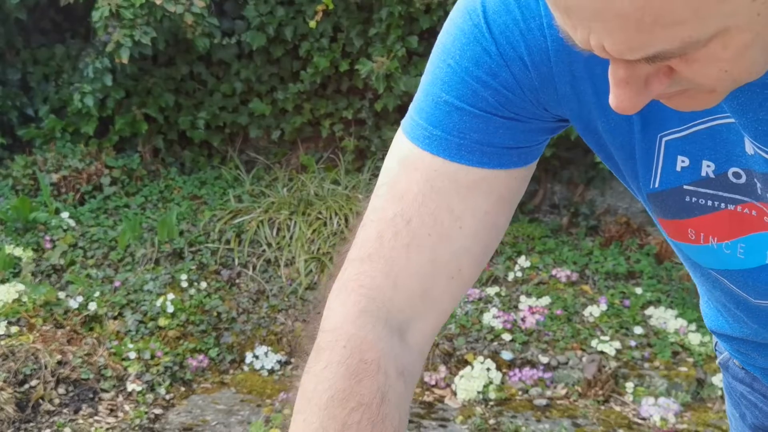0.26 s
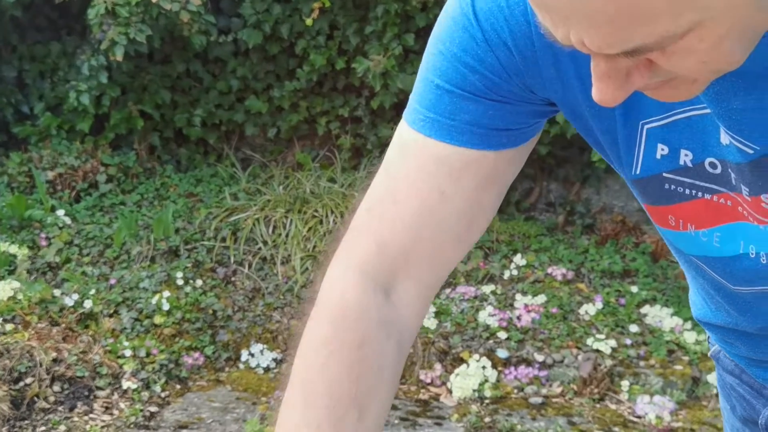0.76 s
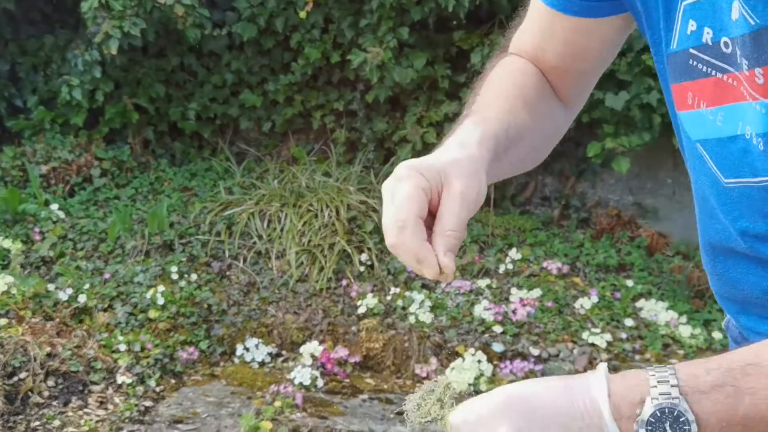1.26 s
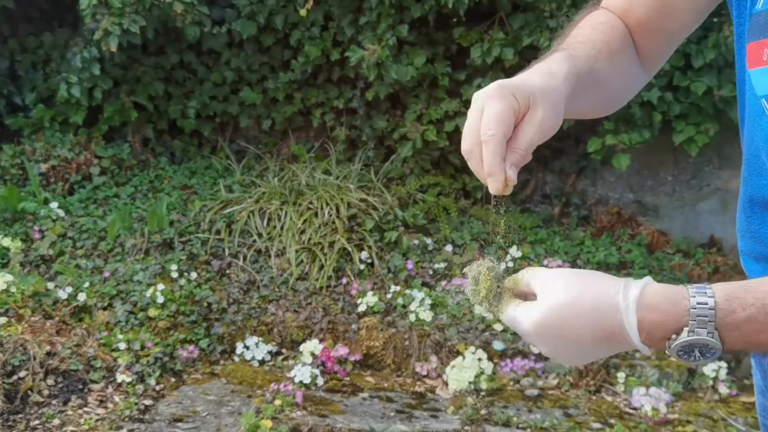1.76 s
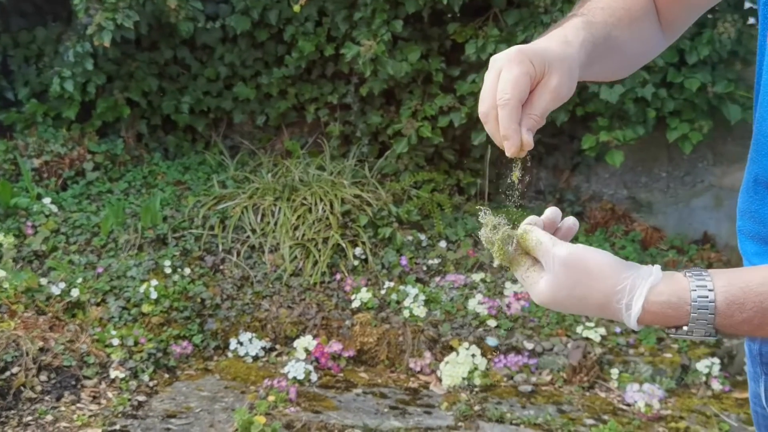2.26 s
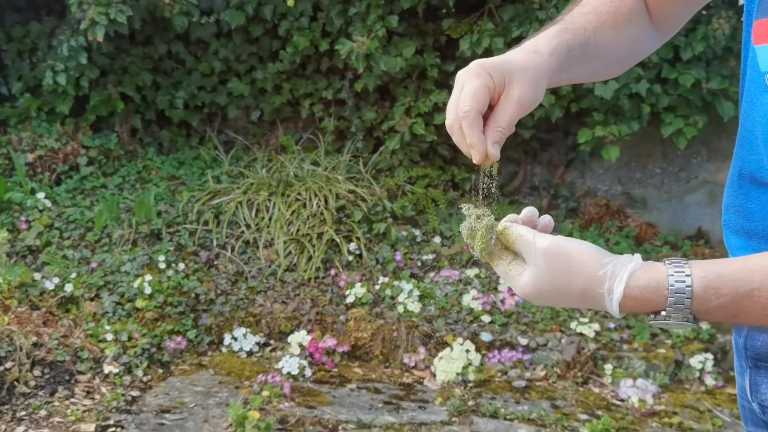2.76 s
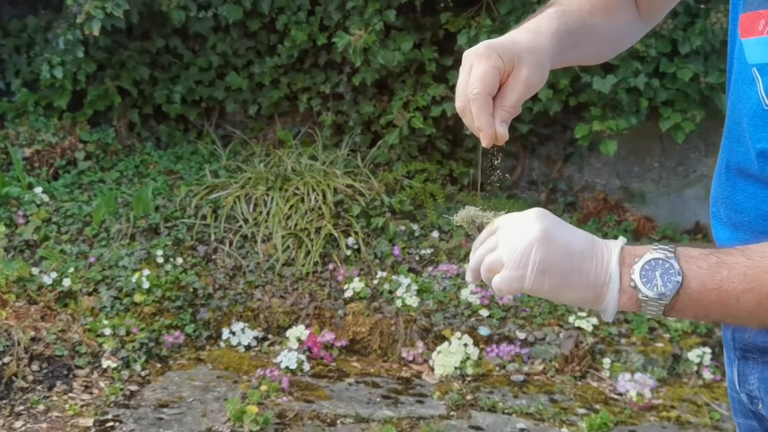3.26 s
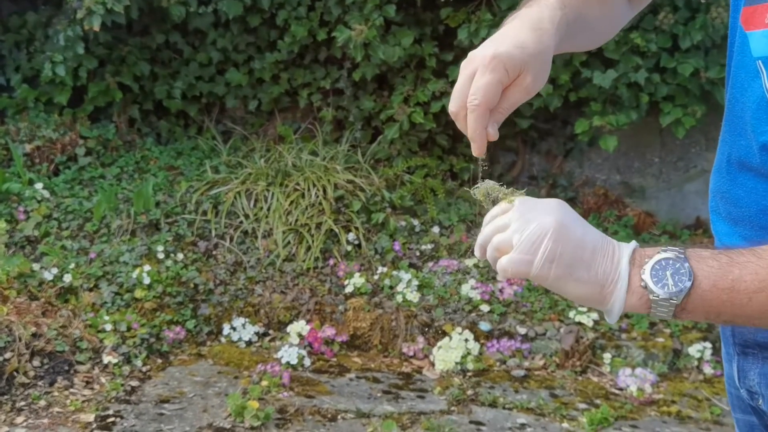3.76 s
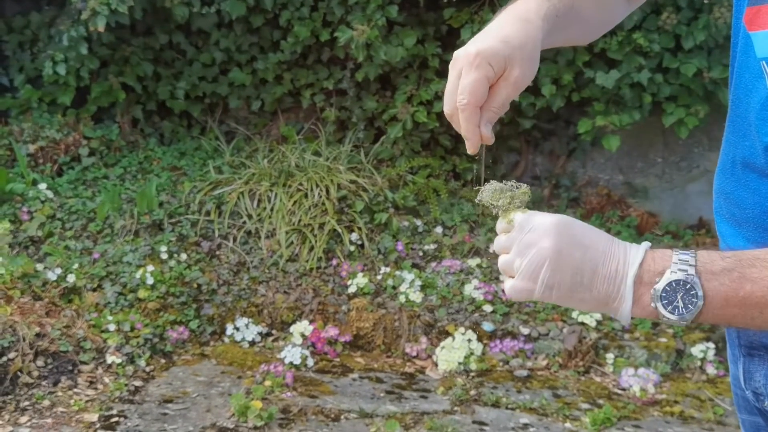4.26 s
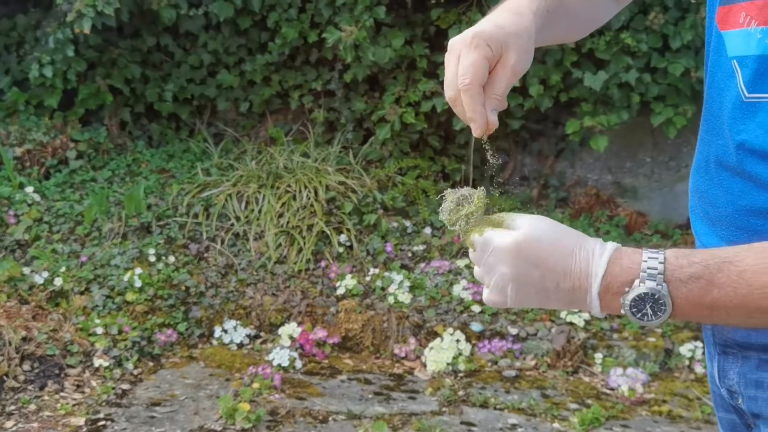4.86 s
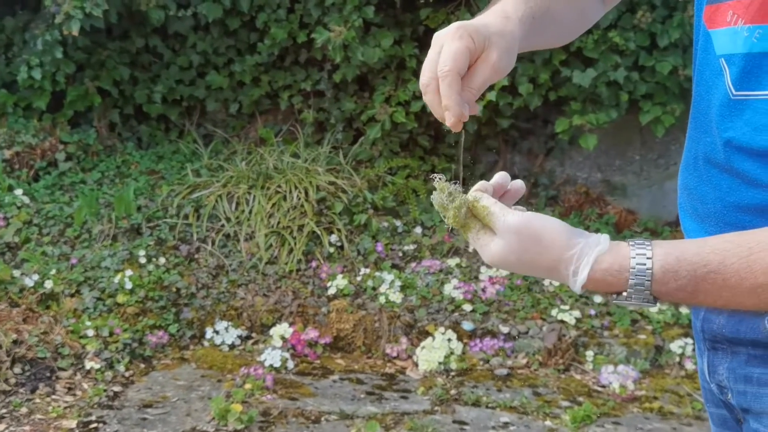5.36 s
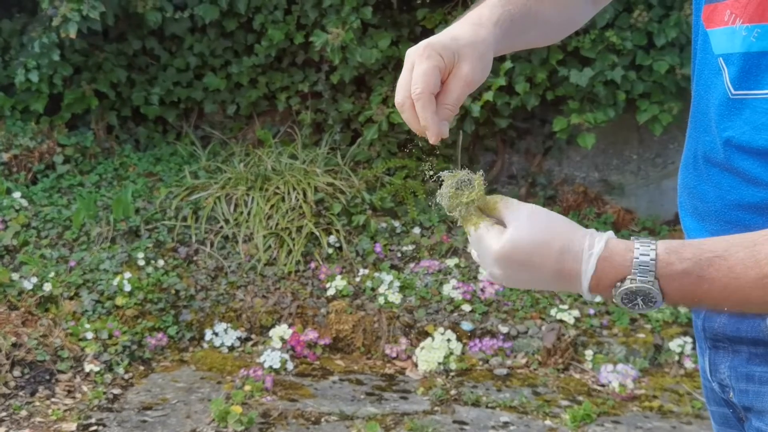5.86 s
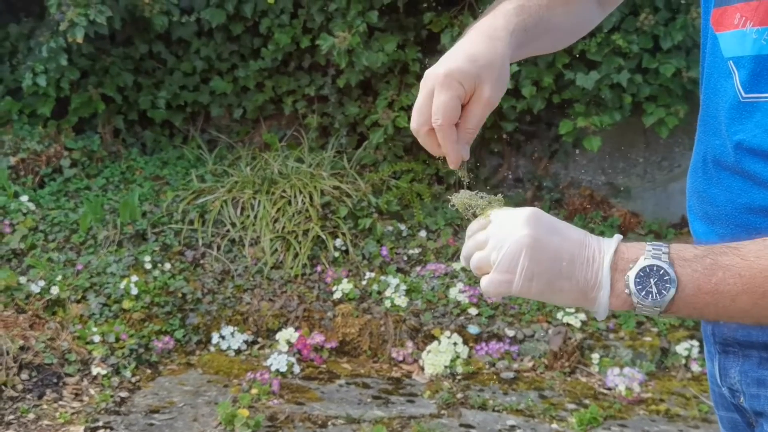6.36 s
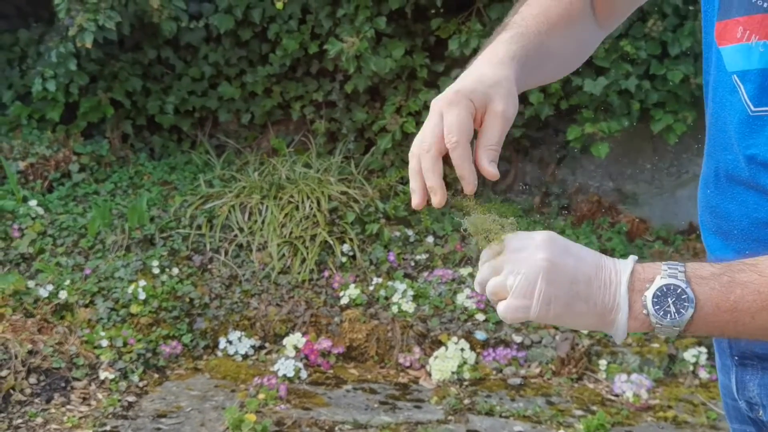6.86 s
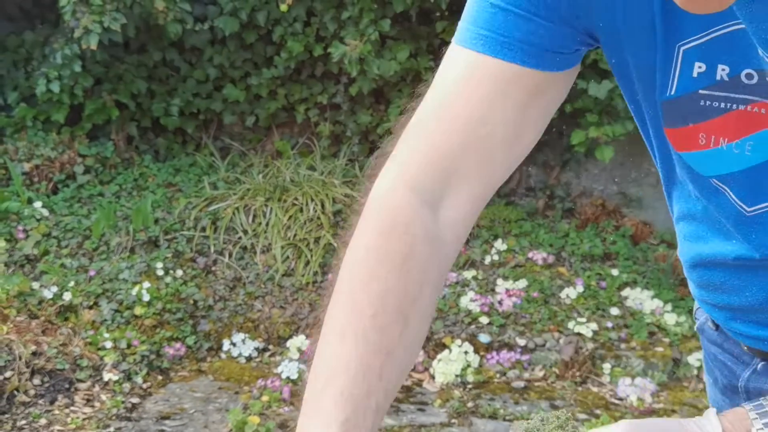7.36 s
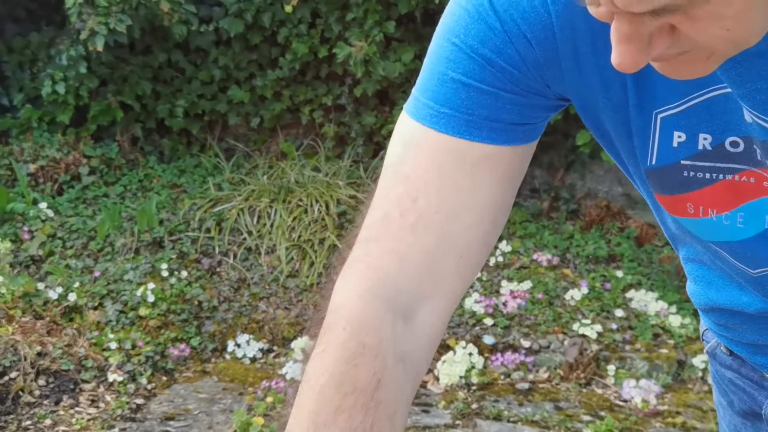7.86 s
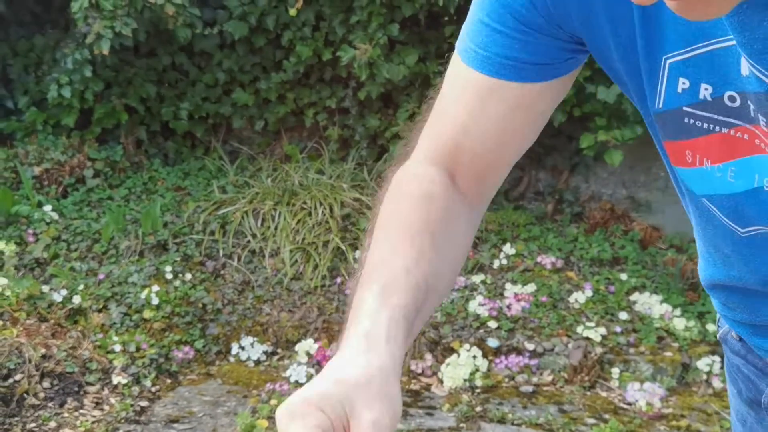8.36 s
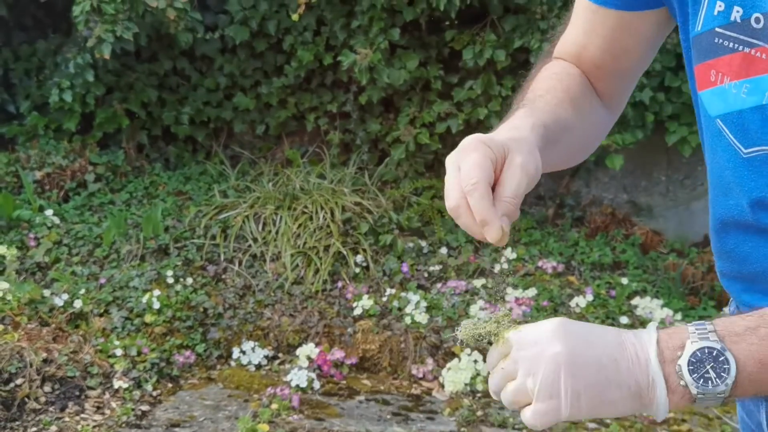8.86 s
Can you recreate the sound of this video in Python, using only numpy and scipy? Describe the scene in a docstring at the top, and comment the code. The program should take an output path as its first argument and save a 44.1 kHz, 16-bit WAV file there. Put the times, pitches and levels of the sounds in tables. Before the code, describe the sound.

In a garden, a hand digs in a packet of dry grains with bright crackles, snaps and a hollow scrape, then stops. A sparrow chirps about once a second, with thin chips, whistles and scolding from the hedges. Only a faint grain patter remains until a second, sharper burst of digging near the end, then a small clink. A far engine hums low throughout. The microphone is close to the packet.

```python
"""A hand digs dry grains out of a packet over a far engine's hum and open air; later it digs again.
Grains: filtered crackle under strokes, with ringing snaps and a thin steady patter; packet: struck modes.
A close sparrow chirps and small birds call and whistle from the hedges: gliding, jittered tones with echoes.
Engine: wandering sine orders over shaped noise; low drones: narrow-band noise; ring and clink: decaying sines."""
import sys
import numpy as np
from scipy import signal
from scipy.fft import rfft, irfft
from scipy.io import wavfile

SR = 44100
rng = np.random.default_rng(int(sys.argv[2]) if len(sys.argv) > 2 else 0)


def transcribe(u):
    """Save the signal u as a 16-bit wav file named by the first command-line argument.

    u: samples, shape (n,) or (channels, n), limited to [-1, 1]; the rate is SR.
    q: integer samples, one column per channel.
    """
    v = np.clip(np.atleast_2d(u).T, -1, 1)
    q = np.round(v * 32767).astype(np.int16)
    wavfile.write(sys.argv[1], SR, q)


N = 402191
TIME = np.arange(N) / SR


def from_db(db):
    """Amplitude factor of a level in dB."""
    return 10 ** (np.asarray(db) / 20)


def rms_one(x):
    """Scales a sound to rms 1."""
    return x / np.sqrt(np.mean(x ** 2) + 1e-20)


def add(track, s, sound):
    """Mixes a sound into a track from time s on."""
    start = max(round(s * SR), 0)
    part = sound[..., :max(N - start, 0)]
    track[..., start:start + part.shape[-1]] += part


def drift(rate_hz, size=N):
    """Random line with a new normal value rate_hz times a second."""
    at = np.arange(size) * rate_hz / SR
    knots = int(at[-1]) + 2
    return np.interp(at, np.arange(knots), rng.standard_normal(knots))


def swells(rows):
    """Power sum of strokes (s, rise s, fall s, dB): 20 dB up in the rise time, 20 dB down in the fall time."""
    power = 0
    for s, rise_s, fall_s, level_db in rows:
        away = np.maximum((s - TIME) / rise_s, (TIME - s) / fall_s).clip(0, 10)
        power = power + from_db(level_db - 20 * away) ** 2
    return np.sqrt(power)


def resonance(x, hz, width_hz):
    """Two-pole resonance, gain 1 on top."""
    r = np.exp(-np.pi * width_hz / SR)
    zeros = np.array([1, 0, -1]) * (1 - r * r) / 2
    poles = [1, -2 * r * np.cos(2 * np.pi * hz / SR), r * r]
    return signal.lfilter(zeros, poles, x)


def per_bin(points):
    """Reads a (Hz, value) table at every frequency of the whole track."""
    hz, value = np.transpose(points)
    return np.interp(np.log(np.fft.rfftfreq(N, 1 / SR) + 1), np.log(hz), value)


def colour(x, spectrum):
    """Gives a sound a spectrum; rms 1."""
    return rms_one(irfft(rfft(x) * from_db(per_bin(spectrum)), N))


def crackle(per_s, spread_db):
    """Random contacts of uneven size and either sign."""
    sizes = from_db(spread_db * np.minimum(rng.exponential(1, N), 4)) * rng.choice([-1, 1], N)
    return sizes * (rng.random(N) < per_s / SR)


def garden(x, lag_ms, near_db, near_t60, tail_db, tail_t60):
    """Direct sound plus early ground and wall echoes and a foliage tail, drawn anew for every sound."""
    t = np.arange(int(tail_t60 * SR)) / SR
    near = from_db(near_db - 60 * t / near_t60) / np.sqrt(near_t60)
    tail = from_db(tail_db - 60 * t / tail_t60) / np.sqrt(tail_t60)
    density = np.hypot(near, tail) * np.sqrt(np.log(1e6) / SR) * (t > .002)
    paths = rng.standard_normal((2, len(t))) * density
    paths[[0, 1], [0, round(lag_ms * SR / 1000)]] = 1    # direct sound
    return signal.fftconvolve(x[None], paths, axes=1)


def note(shape, length_s, base_hz, rough, flutter_db=2.2, trill=0, trill_hz=115, trill_from=0,
         partials=((1, 0),)):
    """Syrinx tone along a shape; the membrane jitters in pitch, flutters in level and may trill part way in."""
    t = np.arange(int(length_s * SR)) / SR
    share, ratio, level_db = np.transpose(shape)
    along = t / length_s
    turns = trill_hz * np.maximum(t - trill_from * length_s, 0)
    jitter = rough * drift(900.5, size=len(t))
    waver = jitter + trill * np.minimum(2 * turns, 1) * np.sin(2 * np.pi * turns)
    hz = base_hz * np.interp(along, share, ratio) * (1 + waver)
    phase = 2 * np.pi * np.cumsum(hz) / SR
    tone = sum(from_db(db) * np.sin(k * phase) for k, db in partials)
    gain = from_db(np.interp(along, share, level_db) + flutter_db * drift(113, size=len(t)))
    return np.sqrt(2) * tone * gain * signal.windows.tukey(len(t), .1)


def calls(rows, shape, place, **voice):
    """Every call (s, length s, base Hz, dB) of one kind, each with its own echoes."""
    out = np.zeros((2, N))
    for s, length_s, base_hz, level_db in rows:
        call = from_db(level_db) * note(shape, length_s, base_hz, **voice)
        add(out, s, garden(call, *place))
    return out


# left-right correlation of diffuse sound: (frequency [Hz], correlation [-1..1])
LIKENESS = [(60, 0.73), (290, 0.84), (640, 0.0061), (1400, -0.43), (3000, 0.2), (12000, 0.013)]


def diffuse(spectrum):
    """Stereo noise from all around, its left-right correlation set per frequency."""
    mid, side = rfft(rng.standard_normal((2, N)))
    alike = np.clip(per_bin(LIKENESS), -1, 1)
    stereo = np.sqrt(1 + alike) * mid + np.sqrt(1 - alike) * side * [[1], [-1]]
    return colour(irfft(stereo, N), spectrum)


# engine hum at twice its rate: (time [s], level before the shared gain [dB])
HUM_LEVEL = [(0.0, -39), (0.28, -42), (1.65, -60.5), (1.7, -47.5), (3.12, -45.5), (3.81, -58.5),
             (3.91, -45.5), (4.32, -70), (5.05, -42.5), (5.13, -61.5), (5.31, -39), (5.41, -49),
             (5.92, -68), (6.07, -42), (6.4, -41.5), (6.45, -64), (6.93, -45), (7.19, -61), (7.34, -47.5),
             (7.8, -46), (7.9, -78), (8.63, -61.5), (9.12, -53)]
# low rumble: (time [s], level before the shared gain [dB])
RUMBLE_LEVEL = [(0.0, -56.5), (1.88, -53.5), (3.45, -59), (5.13, -56.5), (6.37, -51.5), (6.86, -56),
                (8.15, -51), (9.12, -56)]
# engine's weaker orders: (multiple of engine rate [1], starting level against RUMBLE_LEVEL [dB])
ENGINE_ORDERS = [(1, -7.5), (3, -3), (4, -5.5), (5, -8.5)]
# rumble spectrum: (frequency [Hz], density [dB per Hz])
RUMBLE = [(15, -83), (25, -44), (49, -26), (81, -2.5), (108, 1), (177, -9.5), (256, -5), (321, -12),
          (392, -25.5), (600, -39), (780, -72)]
# open-air spectrum: (frequency [Hz], density [dB per Hz])
AIR = [(240, -14), (400, -1.5), (610, -5), (2190, -5), (3790, -17), (5730, -9), (6890, -12.5), (8400, -6.5),
       (10400, -19.5), (11100, -24), (11800, -44), (15500, -34)]
ENGINE_HZ, ENGINE_WANDER_SHARE, ENGINE_RIGHT_LAG_S = 51.9, 0.00806, .0003
HUM_GAIN_DB, HUM_FLICKER_DB = -1, 1.5
ORDER_FADE_DB_PER_S, ORDER_FLICKER_DB = 1.44, 4
RUMBLE_GAIN_DB, AIR_DB, AIR_FLICKER_DB = 3, -60.5, .5


def background():
    """Far engine orders on one wandering rate, the hum swelling on its way through the air, rumble and hiss."""
    hum_db = np.interp(TIME, *np.transpose(HUM_LEVEL))
    rumble_db = np.interp(TIME, *np.transpose(RUMBLE_LEVEL))
    turns = np.cumsum(ENGINE_HZ * (1 + ENGINE_WANDER_SHARE * drift(5))) / SR
    phase = 2 * np.pi * (turns - ENGINE_HZ * np.array([[0], [ENGINE_RIGHT_LAG_S]]))
    orders = [(2, hum_db + HUM_GAIN_DB + HUM_FLICKER_DB * drift(9))]
    for k, db in ENGINE_ORDERS:
        orders.append((k, rumble_db + db - ORDER_FADE_DB_PER_S * TIME + ORDER_FLICKER_DB * drift(6)))
    hum = np.sqrt(2) * sum(from_db(db) * np.sin(k * phase + rng.uniform(0, 2 * np.pi)) for k, db in orders)
    rumble = from_db(rumble_db + RUMBLE_GAIN_DB) * diffuse(RUMBLE)
    air = from_db(AIR_DB + AIR_FLICKER_DB * drift(2.45)) * diffuse(AIR)
    return hum * from_db([[-.9], [.9]]) + rumble + air


# finger strokes in the grains: (time of peak [s], length [s], level [dB])
STIRS = [(.01, 0.21, -32.5), (0.088, 0.14, -39.5), (0.224, .5, -52), (0.304, 0.086, -34.5),
         (0.424, 0.41, -44), (0.508, .09, -46), (0.542, 0.12, -41), (0.579, 0.091, -40), (1.203, 0.36, -58),
         (6.357, 0.18, -55), (6.601, 0.18, -53), (6.928, 0.13, -53.5), (7.626, .05, -52),
         (7.676, 0.12, -38), (7.745, 0.15, -28.5), (7.864, 0.061, -35.5), (7.887, 0.11, -38),
         (7.987, 0.15, -37.5), (8.068, 0.025, -40), (8.759, 0.18, -53)]
# packet snaps: (time [s], direct peak level [dB])
SNAPS = [(0.0217, -10), (.0635, -31), (.083, -32), (0.284, -12.5), (0.293, -16.5), (.309, -19),
         (7.608, -18), (7.63, -18.5), (7.641, -18), (7.657, -16), (7.692, -17), (7.779, -17), (7.868, -20),
         (7.892, -23), (7.959, -26), (7.99, -18), (7.997, -19.5), (8.005, -21), (8.103, -37), (8.162, -33)]
# spectrum of rubbing grains: (frequency [Hz], density [dB per Hz])
GRAINS = [(410, -69.5), (700, -33), (993, -11), (1240, -20.5), (1580, -26.5), (2430, -16.5), (3730, -14.5),
          (6180, -4.5), (7030, -7), (8430, 5.5), (10100, -10.5), (12300, -29), (15500, -28)]
# hand position: (right lag [ms], early echoes [dB], early t60 [s], tail [dB], tail t60 [s])
AT_HAND = (.09, -10, .03, -20, .3)
STIR_RISE_SHARE = .46    # of a stroke's length
SHAKE_DB, SHAKE_RISE_S, SHAKE_FALL_S = -24.5, 0.0027, 0.056    # level against the snap's peak
CREASES_PER_S, CREASE_DB = 130, -5    # level against the stroke
PATTER_PER_S, PATTER_DB = 120, -73
CLUMP_DB, SCATTER_DB = 2.5, 1
SNAP_SPREAD_SHARE, SNAP_T60_S = .025, .012


def grains():
    """Grains slip in clumps, creases give, snaps ring and shake grains loose, a few patter on the leaves."""
    strokes = [(s, STIR_RISE_SHARE * length, (1 - STIR_RISE_SHARE) * length, db) for s, length, db in STIRS]
    shakes = [(s + SHAKE_RISE_S, SHAKE_RISE_S, SHAKE_FALL_S, db + SHAKE_DB) for s, db in SNAPS]
    stir = swells(strokes + shakes) * from_db(CLUMP_DB * drift(220))
    direct = stir * colour(crackle(per_s=4500, spread_db=3.6), GRAINS)
    direct += stir * from_db(CREASE_DB) * colour(crackle(CREASES_PER_S, spread_db=0.5), GRAINS)
    direct += from_db(PATTER_DB) * colour(crackle(PATTER_PER_S, spread_db=7.0), GRAINS)
    t = np.arange(SR // 50) / SR
    for s, peak_db in SNAPS:
        crack = rng.standard_normal(len(t)) * from_db(-60 * t / SNAP_T60_S)
        detune = 1 + SNAP_SPREAD_SHARE * rng.uniform(-1, 1)
        narrow = resonance(crack, hz=8450 * detune, width_hz=410)
        snap = resonance(narrow, hz=7540, width_hz=2900)
        add(direct, s, from_db(peak_db) * snap / np.abs(snap).max())
    # ground and body scatter the rustle, unlike on each side
    scattered = stir * colour(rng.standard_normal((2, N)), GRAINS)
    both = garden(direct, *AT_HAND)[:, :N] + from_db(SCATTER_DB) * scattered
    return both * from_db([[.6], [-.6]])


# packet bumps: (time [s], level [dB], contact softness [s])
BUMPS = [(0.305, -40.5, 0.00023), (7.656, -19, 0.0018), (7.678, -36, 0.00013), (7.698, -40, 0.00025),
         (8.102, -35.5, 0.00013), (8.136, -38, 0.00052)]
# hand scrapes along the packet's wall: (time of peak [s], rise [s], fall [s], level [dB])
SCRAPES = [(.03, 0.08, 0.14, -52.5), (.31, 0.09, 0.16, -52.5), (.57, 0.069, 0.06, -50.5),
           (7.69, 0.048, 0.12, -48.5), (7.77, 0.031, 0.052, -39.5)]
# packet modes: (frequency [Hz], level [dB], t60 [s])
PACKET_MODES = [(182, -10.5, 0.04), (333, -5.5, 0.018), (410, -12, 0.025), (1018, -13, 0.053),
                (1086, 3.5, 0.021), (1210, -22, 0.075), (2153, -7.5, 0.032)]


def packet():
    """Soft bumps stir the low modes, hard ones the hollow ring too; scraping friction keeps the modes going."""
    out = np.zeros(N)
    t = np.arange(SR // 8) / SR
    for s, level_db, soft_s in BUMPS:
        ring = np.zeros(len(t))
        for hz, db, t60 in PACKET_MODES:
            ring += from_db(db + rng.normal(0, 1.5) - 60 * t / t60) * np.cos(2 * np.pi * hz * t)
        push = np.hanning(int(soft_s * SR) + 3)
        add(out, s, from_db(level_db) * np.convolve(ring, push / push.sum()))
    friction = np.diff(crackle(per_s=900, spread_db=3), prepend=0)
    hollow = np.zeros(N)
    for k, (hz, db, t60) in enumerate(PACKET_MODES):
        width_hz = np.log(1000) / (np.pi * t60)
        hollow += (-1) ** k * from_db(db) * resonance(friction, hz, width_hz)
    out += swells(SCRAPES) * rms_one(hollow)
    return garden(out, *AT_HAND)[:, :N]


# piping runs: (start [s], end [s], time of peak [s], pitch at peak [Hz], peak level [dB], fade [dB per s])
PIPING = [(0.018, 1.38, .25, 5130, -57, 14), (3.452, 4.68, 3.75, 5143, -56.5, 13),
          (7.776, 8.97, 7.98, 5210, -52.5, 12)]
# level note: (share of length [0..1], pitch / base pitch [1], level [dB])
LEVEL = [(0, .94, -11), (.12, .99, -2), (.6, 1, 0), (.8, 1, -2), (1, .99, -10)]
# hedge: (right lag [ms], early echoes [dB], early t60 [s], tail [dB], tail t60 [s])
HEDGE = (0, 0.5, 0.33, -17, 0.5)
PIPE_EVERY_S, PIPE_S = .099, .085
PIPE_RISE_DB_PER_S, PIPE_SAG_HZ_PER_S = 23, 44.4


def piping():
    """A far bird's thin note repeats so fast that echoes join it; each run swells, fades and sags in pitch."""
    out = np.zeros((2, N))
    for start, end, peak_s, pitch_hz, level_db, fade_db_per_s in PIPING:
        notes = []
        for s in np.arange(start, end, PIPE_EVERY_S):
            drop_db = max(PIPE_RISE_DB_PER_S * (peak_s - s), fade_db_per_s * (s - peak_s))
            notes.append((s, PIPE_S, pitch_hz - PIPE_SAG_HZ_PER_S * (s - peak_s), level_db - drop_db))
        out += calls(notes, LEVEL, HEDGE, rough=.012, flutter_db=2.5)
    return out


# clink modes: (frequency [Hz], level [dB], t60 [s])
CLINK_MODES = [(1496, -58, 0.63), (2500, -38.5, 0.39), (4750, -42, 0.33), (5800, -46, 0.13),
               (7500, -44, .15)]
CLINK_S = 9.082
RING_S, RING_HZ, RING_DB, RING_T60_S = .066, 2013, -45.5, 0.27


def clink():
    """Small hard things are touched and ring on: one with a single decaying tone, one with several."""
    out = np.zeros(N)
    t = np.arange(SR // 2) / SR
    add(out, RING_S, from_db(RING_DB - 60 * t / RING_T60_S) * np.sin(2 * np.pi * RING_HZ * t))
    modes = sum(from_db(db - 60 * t / t60) * np.sin(2 * np.pi * hz * t) for hz, db, t60 in CLINK_MODES)
    add(out, CLINK_S, modes)
    return garden(out, *AT_HAND)[:, :N]


# level whistles: (time [s], length [s], pitch [Hz], level [dB])
WHISTLES = [(.232, 0.024, 5100, -51), (5.885, 0.16, 4280, -47), (6.143, 0.16, 4200, -48)]
# thin notes that sweep up and hold: (time [s], length [s], base pitch [Hz], level [dB])
UPSWEEPS = [(.448, 0.029, 4340, -45.5), (1.78, 0.09, 6350, -53.5), (5.83, 0.079, 6340, -57.5)]
# very high falling notes: (time [s], base pitch [Hz], level [dB])
SEEPS = [(3.105, 7180, -58), (3.145, 6940, -53), (3.295, 6490, -58.5), (3.39, 6600, -58),
         (5.668, 8250, -39.5), (7.2, 7220, -58.5), (7.41, 7260, -57), (7.465, 6920, -54)]
# high buzz after the loudest falling note: (time [s], length [s], pitch [Hz], level [dB])
BUZZES = [(5.745, 0.087, 8000, -49.5)]
# faint, hoarse far call: (time [s], length [s], base pitch [Hz], level [dB])
FAR_CALLS = [(7.02, 0.145, 1332, -67.5)]
# note shapes: (share of length [0..1], pitch / base pitch [1], level [dB])
SLIDE = [(0, .99, -20), (.3, 1, -9), (.42, .985, 0), (.7, .95, -3), (1, .91, -10)]
RISE = [(0, .65, -9), (.25, .77, -4), (.48, .98, -3), (.65, 1, -1), (.9, .96, 1), (1, .94, -6)]
DROOP = [(0, .86, -14), (.15, .98, -3), (.35, 1, 0), (.8, .94, 0), (1, .9, -10)]
# places: (right lag [ms], early echoes [dB], early t60 [s], tail [dB], tail t60 [s])
OPEN_BRANCH = (0, -3, .08, -12, .42)
DEEP_FOLIAGE = (.1, -1, .18, -1, .5)
SEEP_S = .088


def hedge_birds():
    """Whistling syrinx tones, some in the open, some in strong echoes; fast trill makes the buzz."""
    out = calls(WHISTLES, LEVEL, OPEN_BRANCH, rough=.008)
    out += calls(UPSWEEPS, RISE, DEEP_FOLIAGE, rough=.025)
    out += calls([(s, SEEP_S, hz, db) for s, hz, db in SEEPS], SLIDE, HEDGE, rough=.013)
    out += calls(BUZZES, LEVEL, HEDGE, rough=.045, trill=.08)
    out += calls(FAR_CALLS, DROOP, DEEP_FOLIAGE, rough=.05)
    return out


# thin chips: (time [s], base pitch [Hz], level before the shared gain [dB])
CHIPS = [(0.354, 4790, -56), (.91, 5940, -53), (1.34, 5890, -55.5), (2.002, 5930, -58),
         (2.743, 6000, -60.5), (2.9, 4410, -60.5), (4.19, 5770, -55), (4.721, 5820, -58.5),
         (5.265, 5870, -55), (5.485, 4400, -56.5), (6.053, 5850, -56.5), (6.662, 5930, -55.5),
         (7.195, 5870, -54.5), (8.789, 5940, -54.5)]
# harsh scolding notes: (time [s], base pitch [Hz], level [dB])
SCOLDS = [(.643, 4900, -50.5), (4.341, 4880, -57), (4.436, 4730, -52.5), (4.544, 4990, -52.5),
          (8.205, 4700, -57), (8.294, 5000, -49.5), (8.402, 4990, -54), (8.512, 4920, -49)]
# strands of a scolding note: (pitch ratio [1], level [dB])
SCOLD_VOICES = [(.55, -15), (.79, -10), (1, 0), (1.17, -10), (1.42, -12)]
# note shapes: (share of length [0..1], pitch / base pitch [1], level [dB])
PEAK = [(0, .78, -10), (.25, .94, -4), (.5, 1, 0), (.68, .95, -2), (.82, .8, -6), (1, .68, -11)]
TUMBLE = [(0, 1.04, -8), (.25, .95, -1), (.6, .83, 1), (1, .8, -7)]
# thicket: (right lag [ms], early echoes [dB], early t60 [s], tail [dB], tail t60 [s])
IN_THICKET = (.05, .5, .18, 0, .5)
CHIP_S, CHIP_GAIN_DB, SCOLD_S = 0.082, -1, 0.046
ANSWER_DELAY_S, ANSWER_S, ANSWER_DB = 0.1, 0.051, -5    # level against the chip


def hidden_birds():
    """Foliage blurs peaked chips with weaker rising answers, and many-stranded scolding that falls in pitch."""
    first = [(s, CHIP_S, hz, db) for s, hz, db in CHIPS]
    second = [(s + ANSWER_DELAY_S, ANSWER_S, hz, db + ANSWER_DB) for s, hz, db in CHIPS]
    chips = calls(first, PEAK, IN_THICKET, rough=.022) + calls(second, RISE, IN_THICKET, rough=.025)
    scold_rows = [(s, SCOLD_S, hz, db) for s, hz, db in SCOLDS]
    scolds = calls(scold_rows, TUMBLE, IN_THICKET, rough=.07, partials=SCOLD_VOICES)
    return from_db(CHIP_GAIN_DB) * chips + scolds


# sparrow chirps: (time [s], first syllable length [s], its base pitch [Hz], second syllable length [s],
# its base pitch [Hz], level before the shared gain [dB], form [name])
CHIRPS = [(0.483, 0.056, 4450, 0.055, 3620, -37.5, "rippled"),
          (1.455, 0.058, 5030, 0.066, 3918, -40, "trilled"), (2.412, 0.06, 4670, .037, 4010, -41, "plain"),
          (3.859, 0.049, 4740, 0.037, 3790, -39, "plain"),
          (5.205, 0.049, 4620, 0.042, 3950, -37.5, "plain"),
          (6.304, 0.056, 4606, 0.054, 3640, -37, "rippled"), (7.111, .052, 4690, .04, 3980, -37.5, "plain"),
          (7.933, 0.053, 4590, 0.061, 3610, -39.5, "rippled"),
          (8.984, 0.046, 4690, 0.04, 3940, -36.5, "plain")]
# syllable shapes: (share of length [0..1], pitch / base pitch [1], level [dB])
ARCH = [(0, .62, -17), (.12, .79, -3), (.22, .85, -2), (.32, .92, -11), (.5, .99, -4), (.63, .98, -3),
        (.71, .88, -3), (.77, .8, 5), (.83, .8, -1), (.9, .82, -4), (1, .58, -9)]
HOOK = [(0, .74, -7), (.15, .88, 2), (.42, .96, 4), (.55, 1, -6), (.72, .88, 0), (.86, .77, -6),
        (1, .66, -5)]
ROUND = [(0, .76, -12), (.15, .93, -2), (.5, 1, 4), (.6, .94, -1), (.7, .82, 0), (.8, .79, 1),
         (.88, .82, -6), (1, .64, -16)]
RIPPLE = [(0, .78, -9), (.15, .96, 1), (.42, 1, 3.5), (.52, .85, 0), (.6, .79, -1), (.7, .88, -4),
          (1, .88, -12)]
CLIMB = [(0, .67, -22), (.2, .86, -4), (.5, .92, -4), (.7, 1, 0), (.77, .92, -1), (.83, .75, 2),
         (.89, 1.02, -3), (1, .62, -5)]
TRILL = [(0, .86, 0), (.2, .88, 2), (.35, .98, 2), (.6, 1, -1), (.85, .95, -5), (1, .93, -13)]
# forms: (first shape, second shape, its trill depth [share of pitch], trill start [share of length])
FORMS = {"plain": (ARCH, HOOK, .02, 0),
         "rippled": (ROUND, RIPPLE, .13, .6),
         "trilled": (CLIMB, TRILL, .12, .2)}
# wall echoes of the chirp: (delay [s], level [dB])
WALL_ECHOES = [(.0078, -11), (.0145, -12)]
# places: (right lag [ms], early echoes [dB], early t60 [s], tail [dB], tail t60 [s])
CLOSE_PERCH = (.3, -4.5, .05, -7.5, .5)
FROM_WALL = (0, -2, .08, -10, .45)
SYLLABLE_GAP_S, SPARROW_ROUGH_SHARE, SPARROW_GAIN_DB = 0.0024, .013, 0.6
UPPER_RATIO, UPPER_LEAD_S, UPPER_S, UPPER_DB = 1.21, 0.013, 0.027, -10.5


def sparrow():
    """Two rasping syllables, a faint rising second voice over the first one's start; a wall echoes the chirp."""
    out = np.zeros((2, N))
    for s, first_s, first_hz, second_s, second_hz, level_db, form in CHIRPS:
        opening, ending, trill, trill_from = FORMS[form]
        first = note(opening, first_s, first_hz, SPARROW_ROUGH_SHARE, flutter_db=2, trill=.025, trill_hz=165)
        second = note(ending, second_s, second_hz, SPARROW_ROUGH_SHARE, flutter_db=1.5,
                      trill=trill, trill_from=trill_from)
        upper = note(RISE, UPPER_S, UPPER_RATIO * first_hz, rough=0.05)
        gap = np.zeros(int(SYLLABLE_GAP_S * SR))
        chirp = from_db(level_db + SPARROW_GAIN_DB) * np.concatenate([first, gap, second])
        add(out, s, garden(chirp, *CLOSE_PERCH))
        for delay_s, echo_db in WALL_ECHOES:
            add(out, s + delay_s, garden(from_db(echo_db) * chirp, *FROM_WALL))
        add(out, s - UPPER_LEAD_S, garden(from_db(level_db + UPPER_DB) * upper, *DEEP_FOLIAGE))
    return out


# low drones: (time of peak [s], rise [s], fall [s], pitch [Hz], level [dB])
DRONES = [(1.25, .9, 0.29, 273, -53), (2.0, 0.94, 3.3, 254.6, -57.5), (5.85, 0.51, 0.72, 254, -53.5),
          (6.33, .12, .15, 208, -44), (8.14, 0.095, .1, 363, -48), (8.21, 0.24, 0.33, 263, -47)]
DRONE_WIDTH_HZ = 50    # of each of two resonances in series


def drones():
    """Low drones, some brief swells, some long, each noise in its own narrow band."""
    out = np.zeros(N)
    for s, rise_s, fall_s, hz, db in DRONES:
        once = resonance(rng.standard_normal(N), hz, DRONE_WIDTH_HZ)
        band = resonance(once, hz, DRONE_WIDTH_HZ)
        out += swells([(s, rise_s, fall_s, db)]) * rms_one(band)
    return out


# nasal cheeps: (time [s], length [s], base pitch [Hz], level [dB], upper voice against lower [dB])
CHEEPS = [(1.818, 0.11, 3250, -53.5, -14), (3.187, 0.11, 3363, -53, 2.5), (6.759, 0.094, 3374, -48.5, -2)]
# lower voice: (share of length [0..1], pitch / base pitch [1], level [dB])
SLUR = [(0, .78, -12), (.16, .95, -4), (.32, 1, 0), (.55, .96, 0), (.78, .84, -2), (1, .75, -7)]
CHEEP_UPPER_RATIO, CHEEP_UPPER_SHARE = 1.255, .76    # pitch and length against the lower voice


def cheeps():
    """Both sides of the syrinx sing: the lower slurs far down, the upper droops less and stops sooner."""
    lower, upper = [], []
    for s, length_s, hz, db, upper_db in CHEEPS:
        lower.append((s, length_s, hz, db))
        upper.append((s, CHEEP_UPPER_SHARE * length_s, CHEEP_UPPER_RATIO * hz, db + upper_db))
    strands = [(1, 0), (1.43, -14), (1.79, -19)]    # (pitch ratio, dB)
    return calls(lower, SLUR, HEDGE, rough=.026) + calls(upper, DROOP, HEDGE, rough=.02, partials=strands)


def scene():
    """All sources together."""
    hand = grains() + packet() + clink()
    birds = piping() + hedge_birds() + hidden_birds() + sparrow() + cheeps()
    return background() + hand + birds + drones()


CUTOFF_HZ = 15900


def record(dry):
    """Steep elliptic low-pass cuts the top."""
    return signal.sosfilt(signal.ellip(10, .1, 80, CUTOFF_HZ, fs=SR, output="sos"), dry)


dry = scene()
out = record(dry)
transcribe(out)
```